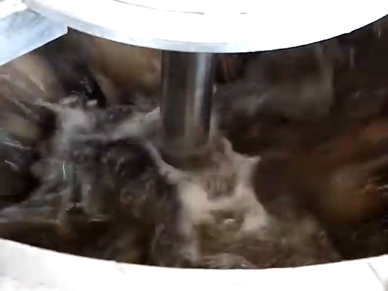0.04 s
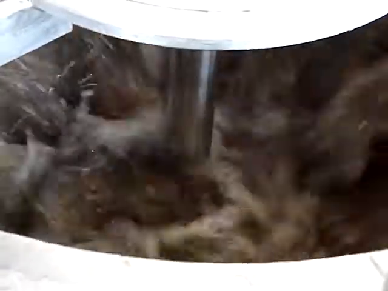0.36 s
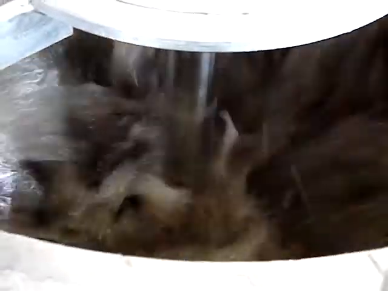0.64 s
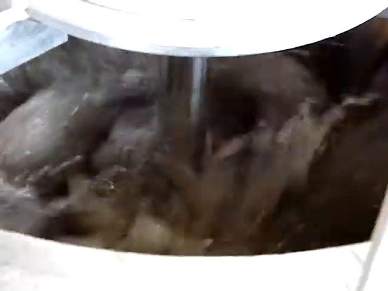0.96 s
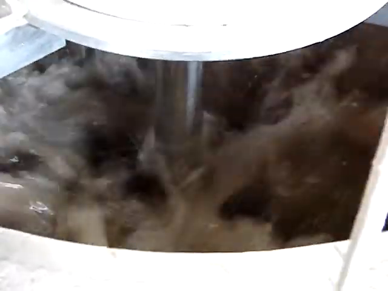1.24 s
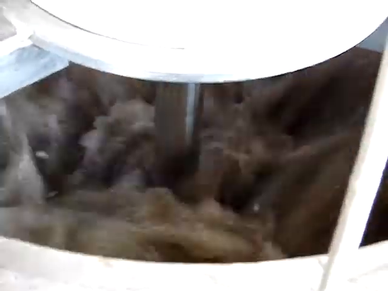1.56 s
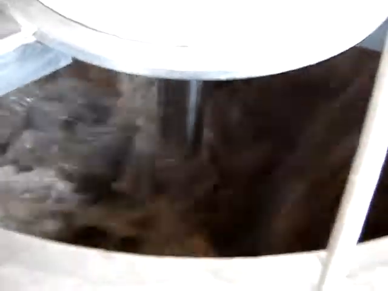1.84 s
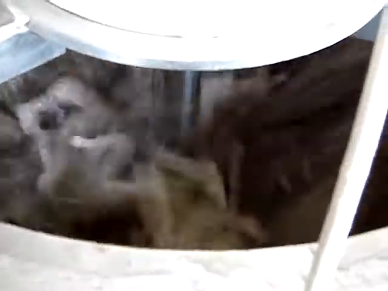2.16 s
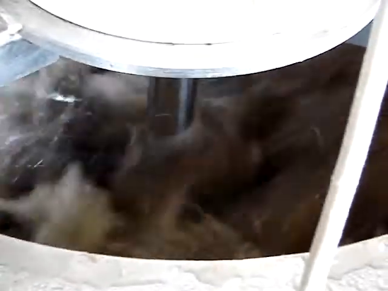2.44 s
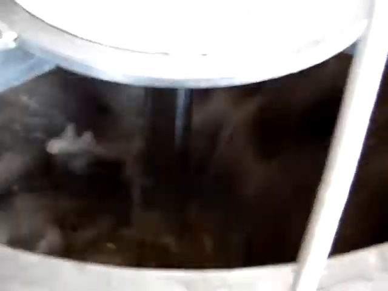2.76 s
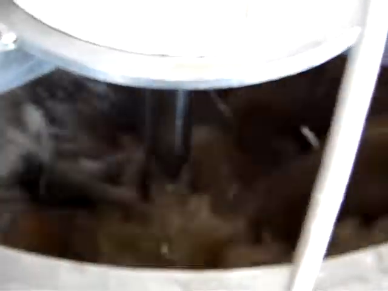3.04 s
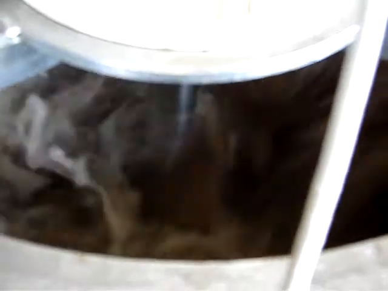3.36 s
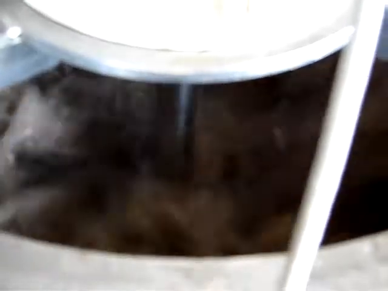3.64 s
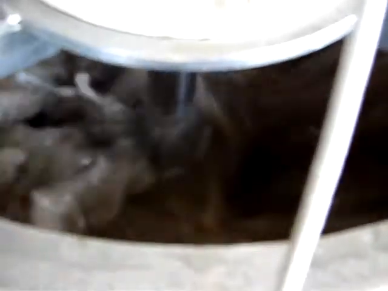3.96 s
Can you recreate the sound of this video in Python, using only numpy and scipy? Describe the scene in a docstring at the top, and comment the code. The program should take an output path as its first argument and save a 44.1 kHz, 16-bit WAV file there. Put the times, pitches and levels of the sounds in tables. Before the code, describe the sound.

A big mixer sloshes watery pulp around a vat, gurgling while its motor whines.

```python
"""An industrial mixer churns watery pulp in a large vat, heard from the rim.
From the start the liquid rumbles, gurgles, splashes and sprays, ringing briefly in the vat over a foam
hiss, while the inverter-fed motor whines up to speed in the first second. Air pockets glug and waves
slap the wall throughout. Big splashes with curling waves land near 0.8, 1.9 and 2.9 s; a gain control
ducks the mix under each. From 1.5 s to the end the motor holds its whine at full load."""
import sys
import numpy as np
from scipy import signal
from scipy.fft import rfft, irfft, next_fast_len
from scipy.io import wavfile
from scipy.ndimage import uniform_filter1d, map_coordinates

SR = 44100
rng = np.random.default_rng(int(sys.argv[2]) if len(sys.argv) > 2 else 0)


def generate_wav(signal):
    """Clip the signal to [-1, 1] and save it as 16-bit WAV at the path in sys.argv[1]."""
    frames = np.transpose(np.atleast_2d(signal))
    scaled = np.clip(frames, -1, 1) * 32767
    pcm = np.round(scaled).astype(np.int16)
    wavfile.write(sys.argv[1], SR, pcm)


N = 176400


def amp(db):
    """Decibels to gain."""
    return 10 ** (np.asarray(db) / 20)


def unit(x):
    """Normalise to rms 1."""
    return x / np.sqrt(np.mean(x ** 2) + 1e-20)


def curve(rows):
    """An automation lane through (time [s], value) breakpoints."""
    return np.interp(np.arange(N) / SR, *np.transpose(rows))


def wobble(rate, size=N):
    """A smooth random modulator, rate knots a second."""
    return map_coordinates(rng.standard_normal(1000), [np.arange(size) * rate / SR], mode="wrap")


def add(out, time, sound):
    """Mix a sound in at a time [s]."""
    part = out[round(time * SR):][:len(sound)]
    part += sound[:len(part)]


def filtered(x, response):
    """Zero-phase filter with gain response(hz)."""
    size = next_fast_len(len(x) + SR // 4)
    return irfft(rfft(x, size) * response(np.fft.rfftfreq(size, 1 / SR)), size)[:len(x)]


def equalised(x, eq):
    """Apply an EQ curve drawn on a log frequency axis, then normalise."""
    points_hz, gains_db = np.transpose(eq)
    return unit(filtered(x, lambda hz: amp(np.interp(np.log(hz + 1), np.log(points_hz + 1), gains_db))))


def turbulence(patchy_db):
    """Churning water: white noise with short patches of random gain in time and frequency."""
    spectrum = signal.stft(rng.standard_normal(N), nperseg=512)[2]
    patches = uniform_filter1d(uniform_filter1d(rng.standard_normal(spectrum.shape), 6, 0), 5, 1)
    return unit(signal.istft(spectrum * amp(patchy_db * unit(patches)), nperseg=512)[1][:N])


def bubbles(lo_hz, hi_hz, cycles, spread_db, rise, count, size):
    """A bubble swarm with a flat spectrum; each pings upward in pitch, dying by 60 dB over its cycles."""
    when, pitch, strength = rng.random((count, 3)).T[:, :, None]
    hz = lo_hz * (hi_hz / lo_hz) ** pitch
    turns = hz * np.arange(size) / SR
    age = turns / cycles
    envelope = np.exp(-np.log(1000) * age) * (1 - np.exp(-2 * turns))
    tone = np.sin(2 * np.pi * turns * (1 + rise * age / 2))
    pings = hz * amp(spread_db * strength ** 2) * tone * envelope
    at = (when * N).astype(int) + np.arange(size)
    return unit(np.bincount(at.ravel() % N, pings.ravel(), N))


# Partials of the whine (multiple of half the switching rate, multiple of the drive frequency,
# run-up level [dB], full-load level [dB]); levels in all tables are relative
MOTOR_PARTIALS = [(0, 6, -37.5, -35.5), (0, 11, -33, -27), (1, -3, -31, -30.5), (1, -1, -37.5, -43.5),
                  (1, 3, -33.5, -23.5), (1, 14, -32.5, -30.5), (1, 16, -53, -43), (2, -11, -46, -38),
                  (2, -6, -45, -40), (2, 0, -33.5, -38), (2, 2, -51, -42.5), (2, 4, -47, -62),
                  (2, 6, -38.5, -45), (2, 7, -59, -41.5), (2, 11, -42, -40), (2, 13, -53, -37),
                  (2, 17, -43, -38), (2, 19, -57, -38), (3, -5, -49, -86), (3, -3, -57, -66),
                  (3, 3, -69, -71), (3, 5, -43.5, -68), (3, 6, -44.5, -49.5), (3, 9, -47, -61),
                  (3, 11, -47, -73), (4, -8, -46, -55), (4, 0, -46, -72), (4, 5, -49, -48)]
# Motor frame resonances that lift passing partials (centre [Hz], half-width [Hz], boost [dB])
FRAME_RESONANCES = [(1831, 12, 8), (5108, 12, 6)]


def motor(start_hz=52.8, ramp_hz_per_s=17.2, full_hz=70.02, switch_hz=3994.4, trim_db=-1.5):
    """Inverter whine: sidebands fan out as the drive speeds up and shift balance as the load comes on."""
    t = np.arange(N) / SR
    drive_hz = np.minimum(start_hz + ramp_hz_per_s * t, full_hz)
    load = np.clip((t - 0.67) / 0.83, 0, 1)
    whine = np.zeros(N)
    for carrier, sideband, run_db, full_db in MOTOR_PARTIALS:
        hz = carrier * switch_hz / 2 + sideband * drive_hz
        frame_db = sum(boost / (1 + ((hz - centre) / width) ** 2)
                       for centre, width, boost in FRAME_RESONANCES)
        level_db = run_db + (full_db - run_db) * load + frame_db + 0.3 * wobble(5.64)
        phase = 2 * np.pi * (np.cumsum(hz) / SR + rng.random()) + 0.29 * wobble(22.18)
        whine += np.sqrt(2) * amp(level_db) * np.sin(phase)
    return amp(trim_db) * whine


# Heave of the low end (time [s], level [dB])
RUMBLE_FADER = [(0, -33), (0.25, -30), (0.65, -28.5), (0.85, -31.5), (1.05, -26), (1.3, -30), (1.53, -27.5),
                (1.63, -31), (1.76, -28.5), (1.9, -25), (2.15, -27.5), (2.45, -29), (2.65, -31),
                (2.85, -29), (3.13, -30), (3.3, -28.5), (3.55, -29), (3.75, -29), (4, -25.5)]
# Deep body of the liquid (frequency [Hz], gain [dB])
RUMBLE_EQ = [(20, -59), (70, -35), (86, -9), (105, -21), (135, -8), (170, -10.5), (205, -2.5), (262, 0),
             (295, -11.5), (420, -38)]


def rumble(trim_db=0.43):
    """The impeller heaves the bulk of the liquid, pushing large bubbles through it."""
    swarm = bubbles(130, 300, cycles=16, spread_db=1, rise=0.1, count=1100, size=4000)
    water = equalised(swarm + turbulence(patchy_db=4), RUMBLE_EQ)
    return water * amp(curve(RUMBLE_FADER) + trim_db)


# Swells of the gurgle (time [s], level [dB])
GURGLE_FADER = [(0, -23), (0.22, -23.5), (0.65, -20), (0.75, -28), (0.88, -19.5), (1.12, -27), (1.3, -21.5),
                (1.45, -26), (1.7, -24.5), (1.88, -21.5), (2.15, -21), (2.42, -27.5), (2.58, -22),
                (2.7, -26.5), (2.85, -23), (3.12, -23), (3.3, -26.5), (3.5, -26), (3.75, -29), (4, -26.5)]
# Hollow midrange peaks (frequency [Hz], gain [dB])
GURGLE_EQ = [(150, -32), (290, 0), (350, 0), (430, 2.5), (510, -6), (610, 3), (690, 5.5), (760, -6.5),
             (870, 1), (1100, -12.5), (2000, -27.5)]


def gurgle(trim_db=-0.27):
    """The vortex drags mid-sized bubbles under."""
    swarm = bubbles(320, 1100, cycles=20, spread_db=3, rise=0.15, count=2000, size=2300)
    water = equalised(swarm + amp(-0.5) * turbulence(patchy_db=1), GURGLE_EQ)
    return water * amp(curve(GURGLE_FADER) + trim_db)


# Surges of the surface (time [s], level [dB])
SPLASH_FADER = [(0, -21), (.35, -17.5), (.76, -17.5), (.81, -11.5), (.95, -13.5), (1.12, -12), (1.3, -21.5),
                (1.55, -26.5), (1.82, -22.5), (1.88, -13), (2.12, -19), (2.45, -24.5), (2.6, -24.5),
                (2.8, -23), (2.87, -13.5), (3.0, -19.5), (3.1, -19), (3.3, -26), (3.65, -26.5),
                (3.76, -21.5), (3.87, -23.5), (4, -19)]
# Broad, wet mids with a soft top (frequency [Hz], gain [dB])
SPLASH_EQ = [(20, -32), (90, -14.5), (400, -3.5), (850, 0), (1200, 0), (1750, 1), (2050, -1.5),
             (2600, -3.5), (3600, -7.5), (4600, -15), (7000, -53), (10000, -46)]


def splash(trim_db=1, flutter_db=1.15):
    """The surface breaks into small bubbles."""
    swarm = bubbles(788, 6090, cycles=24, spread_db=6, rise=0.11, count=7000, size=900)
    water = equalised(swarm + amp(3) * turbulence(patchy_db=1), SPLASH_EQ)
    return water * amp(curve(SPLASH_FADER) + trim_db + flutter_db * wobble(40))


# Flurries of droplets (time [s], level [dB])
SPRAY_FADER = [(0, -38.5), (0.3, -34.5), (0.37, -33.5), (0.5, -34), (0.74, -33.5), (0.8, -29),
               (0.95, -30.5), (1.17, -29.5), (1.3, -35.5), (1.58, -38.5), (1.64, -38), (1.8, -41),
               (1.88, -30.5), (2.15, -35), (2.4, -38.5), (2.8, -38), (2.85, -31), (3.02, -36), (3.3, -37.5),
               (3.42, -37.5), (3.65, -39.5), (3.78, -37.5), (4, -39)]
# Droplet sparkle (frequency [Hz], gain [dB])
SPRAY_EQ = [(1000, -11), (2500, -9), (3700, -0.5), (4600, 0.5), (5300, 1), (6000, -1.5), (8000, -7),
            (10000, -8)]


def spray(trim_db=7, flutter_db=0.94):
    """Fine droplets patter back onto the liquid."""
    swarm = bubbles(2730, 9270, cycles=12.3, spread_db=11.5, rise=0.036, count=22000, size=160)
    patter = equalised(swarm + amp(-5) * turbulence(patchy_db=6.5), SPRAY_EQ)
    return patter * amp(curve(SPRAY_FADER) + trim_db + flutter_db * wobble(31.72))


def vat(x, t60_s=0.21, wet_db=-8, tails=41):
    """Direct sound plus the vat's short ring, crossfading from tail to tail as the surface moves."""
    t = np.arange(SR // 4) / SR
    position = np.linspace(0, tails - 1, N)
    wet = np.zeros(N)
    for k in range(tails):
        tail = rng.standard_normal(len(t)) * amp(-60 * t / t60_s)
        near = np.flatnonzero(abs(position - k) < 1)
        send = x[near] * np.cos(np.pi / 2 * (position[near] - k))
        add(wet, near[0] / SR, signal.fftconvolve(send, tail / np.linalg.norm(tail)))
    return (x + amp(wet_db) * wet) / np.hypot(1, amp(wet_db))


# Tone of the foam bed (frequency [Hz], gain [dB])
FOAM_EQ = [(100, -11), (500, 11.5), (900, 5.5), (1500, 1), (2400, 11.5), (3300, -4.5), (4500, -20),
           (5300, -7.5), (5900, -34), (10000, -32)]


def foam(level_db=-26):
    """Swirling foam lays a steady bed of hiss."""
    return equalised(turbulence(patchy_db=2.5), FOAM_EQ) * amp(level_db + 0.33 * wobble(11))


def cavity(length, start_hz, end_hz, attack_s, release_s):
    """Envelope and phase of an air cavity whose pitch glides as it changes size."""
    t = np.arange(SR // 4) / SR
    hz = start_hz * (end_hz / start_hz) ** np.minimum(t / length, 1)
    closing = np.minimum((t - length) / (release_s / 2), 50)
    envelope = (1 - np.exp(-t / attack_s)) / (1 + np.exp(closing))
    return envelope, 2 * np.pi * np.cumsum(hz) / SR


# Collapsing air pockets (time [s], length [s], level [dB], start pitch [Hz], end pitch [Hz])
GLUG_CUES = [(.086, 0.014, -17.5, 860, 824), (.21, 0.017, -17.5, 438, 428), (.384, 0.038, -21.5, 211, 220),
             (0.48, 0.028, -19.5, 649, 657), (.654, 0.025, -24.5, 226, 215), (0.71, 0.019, -11, 2660, 2460),
             (0.861, 0.03, -17.5, 712, 720), (0.909, 0.027, -18, 697, 638), (1.182, 0.034, -12.5, 694, 685),
             (1.353, .01, -13.5, 1580, 1670), (1.52, 0.036, -26.5, 231, 230),
             (1.728, 0.053, -26.5, 244, 241), (1.808, 0.022, -23, 740, 783), (2.52, 0.028, -19.5, 416, 750),
             (2.801, .014, -19.5, 720, 810), (3.017, 0.013, -13, 1390, 1260),
             (3.128, .016, -16.5, 864, 800), (3.146, 0.018, -14.5, 560, 638),
             (3.767, 0.012, -11, 1570, 1790), (3.942, 0.018, -20.5, 660, 836)]


def glugs(waver_rad=0.38):
    """An air pocket rings with a wavering, gliding pitch: big ones gulp, small ones plop."""
    out = np.zeros(N)
    for time, length, db, start_hz, end_hz in GLUG_CUES:
        envelope, phase = cavity(length, start_hz, end_hz, attack_s=0.0027, release_s=0.0075)
        tone = np.sin(phase + waver_rad * wobble(170, size=len(phase)))
        add(out, time, np.sqrt(2) * amp(db) * envelope * tone)
    return out


# Wave hits on the wall (peak time [s], decay [s], level [dB], band centre [Hz])
SLAP_CUES = [(0.132, 0.011, -18.5, 2400), (0.291, 0.017, -19, 2600), (0.36, 0.013, -16.5, 2220),
             (0.391, 0.027, -20, 3000), (0.628, 0.016, -20, 2500), (0.711, 0.035, -16, 2230),
             (0.787, 0.023, -15.5, 2940), (0.834, 0.0084, -10.5, 3100), (0.887, 0.023, -14, 1550),
             (0.988, .035, -15, 2700), (1.077, 0.068, -15.5, 1000), (1.154, 0.051, -17, 2980),
             (1.362, 0.0075, -14.5, 1800), (1.63, 0.028, -23.5, 2860), (1.859, 0.026, -17, 2440),
             (2.022, 0.0096, -11, 2130), (2.588, 0.017, -19, 1220), (2.828, .014, -23, 2290),
             (2.87, 0.024, -15.5, 3000), (2.93, 0.023, -15.5, 2420), (2.954, 0.018, -14, 1260),
             (3.023, 0.0046, -20, 1620), (3.085, 0.018, -15, 1380), (3.747, 0.015, -18.5, 2000),
             (3.962, 0.02, -20, 1290)]


def slaps(width_octaves=0.77, attack_share=0.27, skirt_db=-20, spray_db=-24, clump_db=2):
    """Each wave hits the wall with a quick, clumpy burst of bubbles around one pitch and a little spray."""
    t = np.arange(-SR // 20, SR // 8) / SR
    out = np.zeros(N)
    swarm = bubbles(700, 5000, cycles=22, spread_db=4, rise=0.15, count=3500, size=900)
    water = swarm + amp(-3) * turbulence(patchy_db=1)
    for time, decay, db, centre in SLAP_CUES:
        burst = water[rng.integers(N - len(t)):][:len(t)]
        band = filtered(burst, lambda hz: np.exp(-(np.log2((hz + 1) / centre) / width_octaves) ** 2)
                        + amp(skirt_db) / (1 + (hz / (2 * centre)) ** 2)
                        + amp(spray_db) * hz / (hz + centre))
        envelope = np.exp(-(t / np.where(t < 0, attack_share * decay, decay)) ** 2)
        clumps = amp(clump_db * wobble(110, size=len(t)))
        add(out, time + t[0], amp(db) * unit(band * envelope * clumps) * np.sqrt(np.mean(envelope ** 2)))
    return out


# Curling waves (time [s], length [s], level [dB], start pitch [Hz], end pitch [Hz])
SLOSH_CUES = [(0.777, 0.14, -16.5, 1950, 1514), (1.0, .12, -23, 1650, 1180), (1.85, .11, -14.5, 1613, 1700),
              (2.824, 0.099, -18, 1660, 1930)]


def sloshes(width_hz=320):
    """A wave curls over; the spray inside it excites the hollow, whose pitch slides."""
    out = np.zeros(N)
    for time, length, db, start_hz, end_hz in SLOSH_CUES:
        envelope, phase = cavity(length, start_hz, end_hz, attack_s=0.024, release_s=0.01)
        stir = wobble(width_hz, size=len(phase)) + 1j * wobble(width_hz, size=len(phase))
        ring = np.real(stir / (abs(stir) + 1e-6) * np.exp(1j * phase))  # random phase, even level
        add(out, time, amp(db) * unit(ring * envelope) * np.sqrt(np.mean(envelope ** 2)))
    return out


def scene():
    """Mono mix: the liquid rings in its vat; near-wall hits, foam and the motor above stay dry."""
    liquid = splash() + spray() + gurgle() + rumble()
    return (vat(liquid) + slaps() + sloshes() + glugs() + foam() + motor())[None]


def record(dry, threshold_db=-16.5, window_s=0.025, attack_s=0.012, release_db_per_s=15, top_hz=10080):
    """Gain control ducks the whole mix on loud splashes and recovers slowly; a high cut follows."""
    power = abs(uniform_filter1d(dry[0] ** 2, int(window_s * SR)))
    over_db = np.maximum(10 * np.log10(power + 1e-12) - threshold_db, 0)
    release_db = release_db_per_s * np.arange(N) / SR
    held_db = np.maximum.accumulate(over_db + release_db) - release_db
    pole = np.exp(-1 / (attack_s * SR))
    duck_db = signal.lfilter([1 - pole], [1, -pole], held_db, zi=[held_db[0]])[0]
    return filtered(dry[0] * amp(-duck_db), lambda hz: hz < top_hz)[None]


dry = scene()
out = record(dry)
generate_wav(out)
```